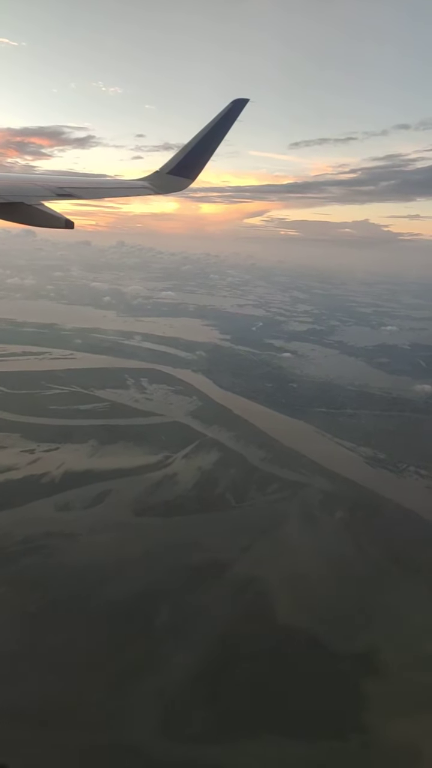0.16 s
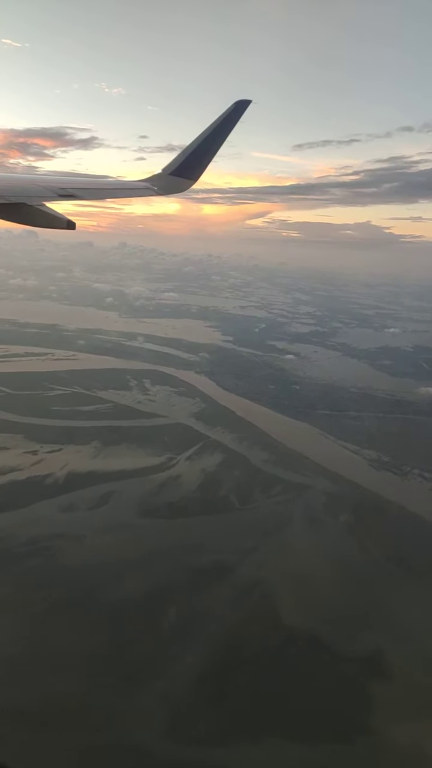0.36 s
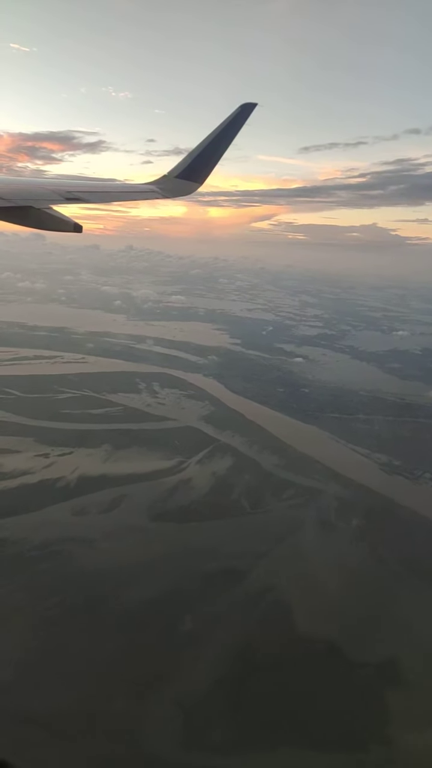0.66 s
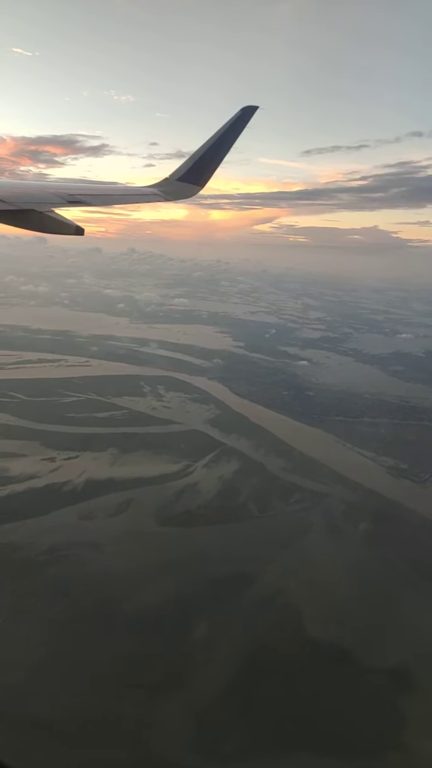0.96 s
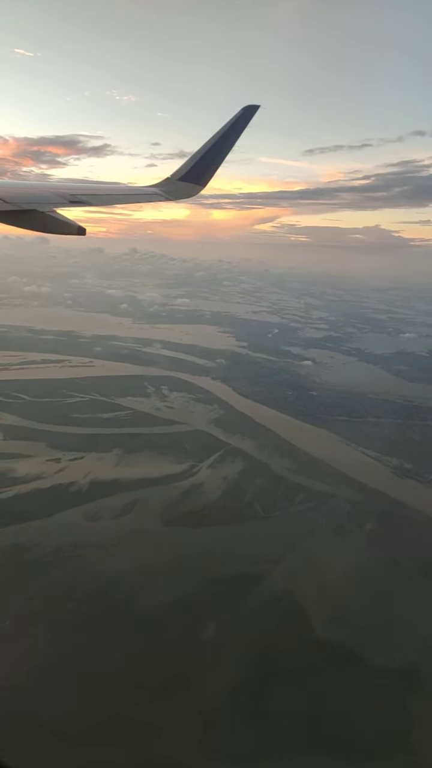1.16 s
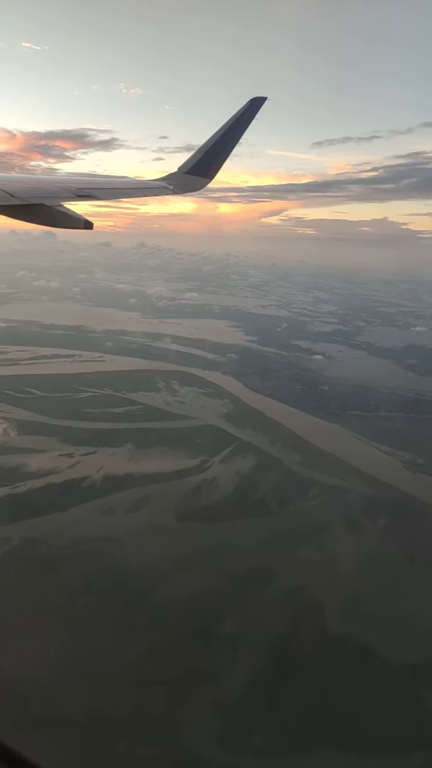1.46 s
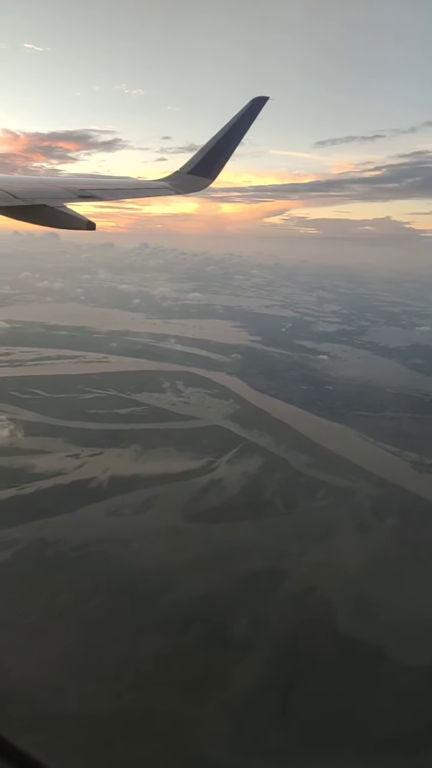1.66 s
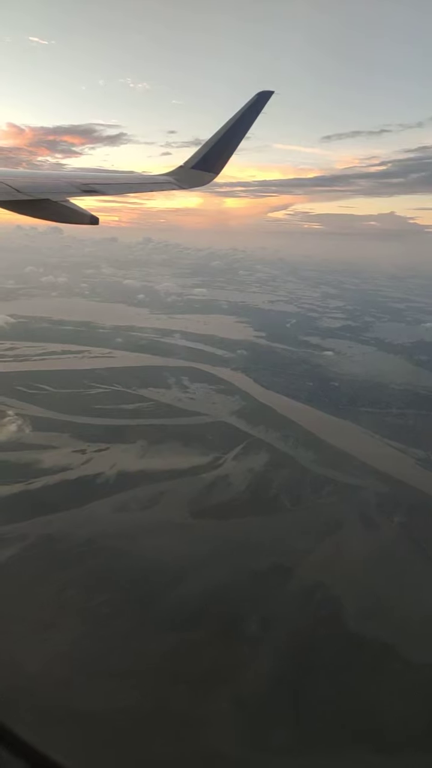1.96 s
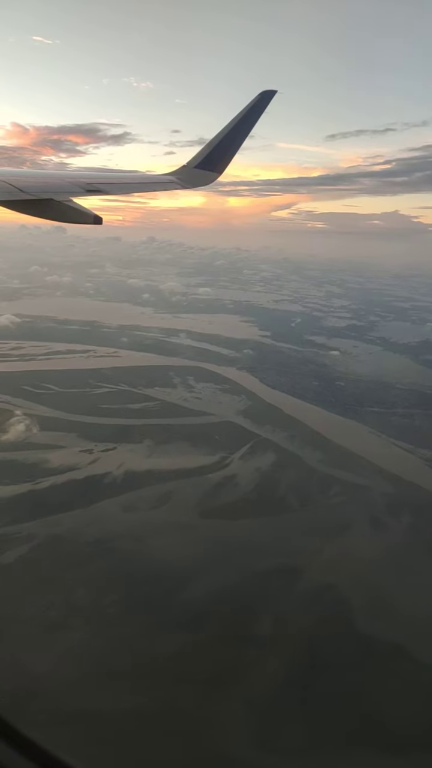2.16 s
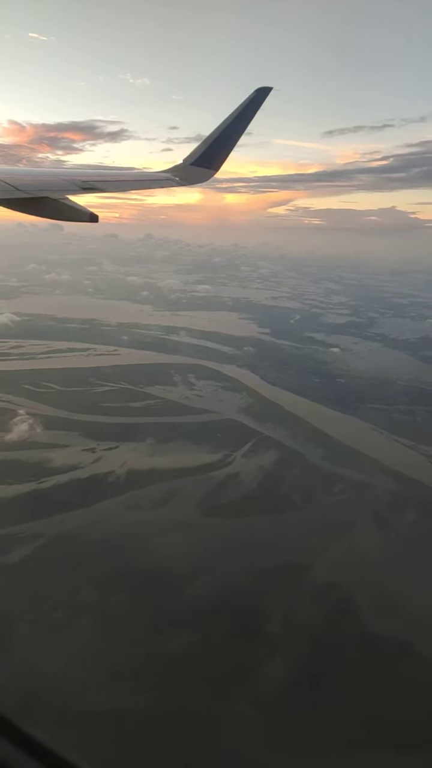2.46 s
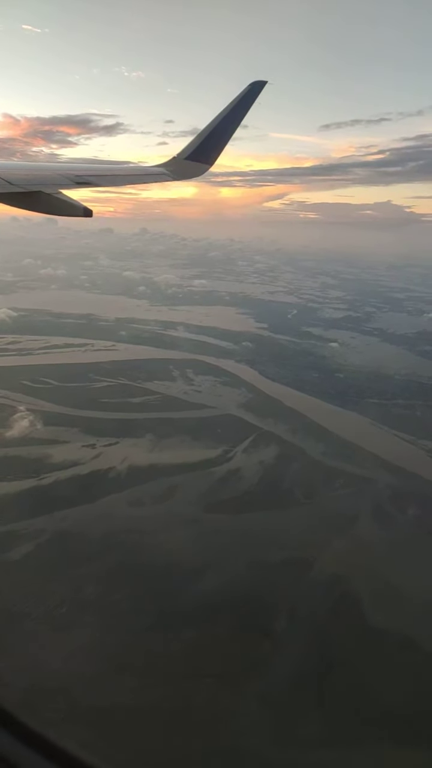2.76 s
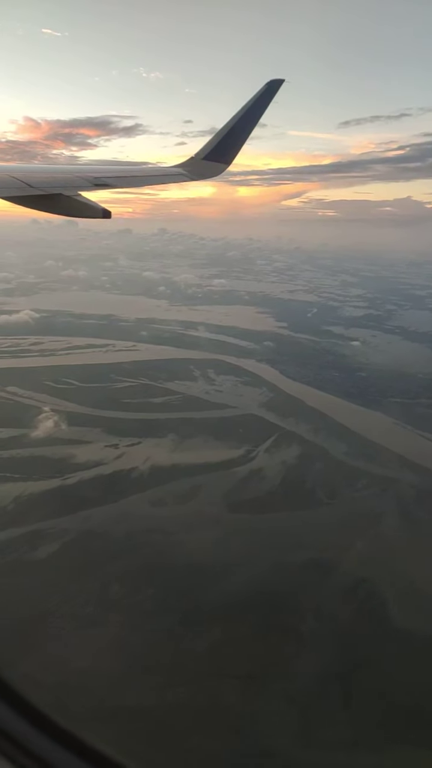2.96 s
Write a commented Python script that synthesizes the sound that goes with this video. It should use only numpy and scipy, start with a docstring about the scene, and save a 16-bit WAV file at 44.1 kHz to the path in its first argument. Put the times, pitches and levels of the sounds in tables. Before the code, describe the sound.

A deep jet engine drone fills an airliner cabin in flight. It heaves slightly with a few soft low bumps, while air rushes and hisses faintly along the wall, heard from a window seat.

```python
"""Airliner window seat in flight

Engine exhaust and turbulent air shake the fuselage: a deep drone that booms in the cabin's resonances.
Air rushing along the skin swells and eases, and rings the wall and window panels in narrow bands,
over an even ventilation hiss. The bass sits in the centre, the treble spreads wide."""
import sys
import numpy as np
from scipy import signal
from scipy.fft import rfft, irfft
from scipy.io import wavfile

SR = 44100
rng = np.random.default_rng(int(sys.argv[2]) if len(sys.argv) > 2 else 0)


def int16_out(signal):
    """Quantize to a 16-bit WAV file."""
    q = np.round(np.clip(np.atleast_2d(signal).T, -1, 1) * 32767)
    wavfile.write(sys.argv[1], SR, q.astype(np.int16))


N = 136710
HZ = np.maximum(np.arange(N // 2 + 1) * SR / N, 1)  # frequency of each FFT bin

# swell contour of the skin hiss and the treble panels: t/s, level/dB
TREBLE_CONTOUR = [(0.0, -58.5), (0.26, -63), (0.53, -66), (0.71, -60.5), (1.06, -61), (1.34, -59),
                  (1.42, -66), (1.57, -59), (1.7, -61), (1.82, -60), (2.0, -63), (2.16, -64), (2.34, -59.5),
                  (2.53, -61), (2.64, -63), (2.8, -58), (2.96, -64), (3.05, -59)]


def drone(low_cut_hz=36, high_cut_hz=700, sub_top_hz=89, bass_top_hz=194):
    """Exhaust and turbulence shake the fuselage and cabin: steady sub, heaving bass, flickering body."""
    # fuselage rumble: f/Hz, relative level/dB
    spectrum = [(22, -28), (59, -25.5), (86, -13), (147, -4.5), (297, -1.5), (454, -10.5), (493, -14),
                (631, -24.5), (755, -29), (1100, -30), (1430, -33), (2420, -120)]
    # cabin resonances: f/Hz, width/Hz, level/dB
    cabin_modes = [(101.3, 13, -50), (144.9, 15.2, -40), (287, 24.3, -45), (497.5, 6.8, -54.5),
                   (535.7, 9.3, -57.5), (567, 33, -61.5)]
    # swell contour of the bass: t/s, level/dB
    bass_contour = [(0.0, -41), (0.21, -34.5), (0.26, -45), (0.34, -33.5), (0.47, -32), (0.61, -45.5),
                    (0.71, -27.5), (0.97, -48), (1.02, -32.5), (1.23, -41.5), (1.41, -34), (1.49, -42),
                    (1.62, -28), (1.69, -38.5), (1.76, -35.5), (2.02, -32.5), (2.08, -43), (2.17, -36.5),
                    (2.64, -37.5), (2.78, -42), (3.05, -39)]
    # swell contour of the low mids: t/s, level/dB
    body_contour = [(0.0, -33), (0.59, -33), (0.63, -36.5), (1.51, -32), (1.56, -38), (1.69, -43.5),
                    (1.75, -26.5), (1.9, -42), (2.0, -37), (2.17, -34.5), (2.25, -28.5), (3.05, -34.5)]
    band = 1 / np.sqrt(1 + (HZ / high_cut_hz) ** 10 + (low_cut_hz / HZ) ** 10)
    rumble = undb(-33.5) * noise(undb(over_hz(spectrum)) * band)
    rumble += sum(undb(db) * noise(resonance(hz, width)) for hz, width, db in cabin_modes)
    lows = irfft(rfft(rumble) / (1 + (HZ / bass_top_hz) ** 10), N)
    sub = irfft(rfft(lows) / (1 + (HZ / sub_top_hz) ** 10), N)
    bass = (lows - sub) * swell(bass_contour, depth=0.88)
    body = eddies(rumble - lows, depth_db=2.5, rate_hz=26, low_hz=217.6, bands=16)
    return at_microphones(sub + bass + body * swell(body_contour, depth=0.41))


def bumps(waver=0.0386, waver_hz=30):
    """Each bump of turbulence rings the cabin at a low, unsteady pitch that builds and dies away."""
    # cabin booms: t/s, f/Hz, rise/s, decay/s, level/dB
    booms = [(0.335, 148, 0.0089, 0.076, -28), (0.508, 128, 0.012, 0.01, -29),
             (0.684, 151.2, 0.014, 0.027, -32), (2.614, 194, 0.002, 0.019, -27.5),
             (2.618, 104, 0.024, 0.032, -35)]
    t, out = np.arange(N) / SR, 0
    for start, hz, rise, decay, db in booms:
        age = np.maximum(t - start, 0)
        envelope = (1 - np.exp(-(age / rise) ** 2)) * np.exp(-age / decay)
        pitch = hz * (1 + waver * walk(waver_hz))
        cycles = np.cumsum(pitch) / SR + rng.random()
        out += undb(db) * envelope / envelope.max() * unit(np.sin(2 * np.pi * cycles))
    return out


def airflow():
    """Turbulent air outside the wall: a dull rush and a brighter hiss, both swelling and easing."""
    # dull rush: f/Hz, relative left level/dB, relative right level/dB
    rush_spectrum = [(415, -38, -18), (634, -7, 8), (814, -1, 2.5), (1068, -6.5, -4.5), (1380, -5.5, -6),
                     (1950, -11.5, -3.5), (2170, -10, -21), (3500, -56, -49)]
    # hiss along the skin: f/Hz, relative left level/dB, relative right level/dB
    hiss_spectrum = [(1510, -20.5, -7.5), (2400, -5, -6), (2620, -5.5, 3.5), (2970, -7, -5),
                     (3320, -5, -0.5), (3950, -14, -9.5), (4300, -18.5, -6), (4840, -16, -9),
                     (5100, -28, -16), (6470, -25, -7.5), (7540, -15, -28.5), (8200, -22.5, -30),
                     (12000, -61, -57)]
    # swell contour of the rush: t/s, level/dB
    rush_contour = [(0.0, -53), (0.2, -55), (0.26, -60.5), (0.44, -49), (0.5, -60.5), (0.66, -55),
                    (0.71, -61), (0.77, -55), (1.19, -59.5), (1.33, -59), (1.39, -59.5), (1.56, -54.5),
                    (2.14, -57.5), (2.21, -55), (2.42, -61.5), (3.05, -57.5)]
    rush = noise(undb([over_hz(rush_spectrum, column) for column in (1, 2)]))
    hiss = noise(undb([over_hz(hiss_spectrum, column) for column in (1, 2)]))
    rush = undb(-51) * eddies(rush, depth_db=5, rate_hz=12.5, low_hz=552, bands=16)
    hiss = undb(-59) * eddies(hiss, depth_db=3.5, rate_hz=14, low_hz=1916, bands=17)
    return rush * swell(rush_contour, depth=0.73) + hiss * swell(TREBLE_CONTOUR, depth=0.89)


def surges():
    """Brief surges in the airflow: bands of noise that swish in and out on a bell curve."""
    # swishes: centre t/s, length/s, f/Hz, width/Hz, level/dB
    swishes = [(0.79, 0.085, 593, 119, -43.5), (1.108, 0.14, 2840, 110, -62.5),
               (1.242, 0.057, 460, 150, -38), (1.327, 0.033, 1653, 220, -47.5),
               (1.334, 0.032, 3360, 450, -51.5), (1.361, 0.054, 239, 49, -36),
               (1.903, 0.058, 2700, 595, -54.5), (2.01, 0.05, 328, 68.6, -28),
               (2.374, 0.069, 697, 220, -46), (0.355, 0.043, 785, 130, -47.5),
               (2.785, 0.035, 2950, 1000, -51.5)]
    t, out = np.arange(N) / SR, 0
    for centre, length, hz, width, db in swishes:
        bell = np.exp(-2 * ((t - centre) / length) ** 2)
        burst = noise(resonance(hz, width)) * bell
        out += undb(db) * burst * np.linalg.norm(bell) / np.linalg.norm(burst, axis=1, keepdims=True)
    return at_microphones(out)


def wall():
    """Wall and window panels sound a hollow midrange ring, a treble ring and a thin sizzle."""
    # midrange panel modes: f/Hz, width/Hz, left level/dB, right level/dB
    ring_modes = [(1515, 120, -55, -62), (1631, 65, -52, -68.5), (1708, 96, -59, -80.5)]
    # treble panel modes: f/Hz, width/Hz, left level/dB, right level/dB
    treble_modes = [(2472, 52, -68.5, -77), (2812, 90, -66.5, -74.5), (2992, 60, -65, -72)]
    # highest panel modes: f/Hz, width/Hz, left level/dB, right level/dB
    sizzle_modes = [(6720, 520, -90, -70), (6760, 55, -74, -73.5), (7280, 350, -78, -75.5)]
    # swell contour of the midrange ring: t/s, level/dB
    ring_contour = [(0.0, -49.5), (0.14, -50), (0.56, -61), (0.63, -54.5), (0.81, -49.5), (1.04, -56),
                    (1.32, -53), (1.4, -61.5), (1.54, -54.5), (1.92, -51.5), (1.99, -60), (2.08, -50),
                    (2.28, -55.5), (2.35, -50), (2.46, -50.5), (2.64, -58), (2.7, -54.5), (2.9, -57),
                    (3.05, -50.5)]
    # swell contour of the sizzle: t/s, level/dB
    sizzle_contour = [(0.0, -67), (0.37, -70), (0.78, -67), (1.37, -73), (1.84, -65.5), (1.99, -74),
                      (2.04, -66.5), (2.27, -70), (3.05, -68.5)]
    ring = panels(ring_modes, flutter_db=2.25, flutter_hz=12) * swell(ring_contour, depth=0.99)
    treble = panels(treble_modes, flutter_db=2.5, flutter_hz=54) * swell(TREBLE_CONTOUR, depth=1)
    sizzle = panels(sizzle_modes, flutter_db=2, flutter_hz=11) * swell(sizzle_contour, depth=1.4)
    return ring + treble + sizzle


def panels(modes, flutter_db, flutter_hz):
    """Panel resonances shaken by turbulence, each fluttering on its own."""
    return sum(noise(resonance(hz, width)) * undb([[left], [right]]) * flutter(flutter_db, flutter_hz)
               for hz, width, left, right in modes)


def ventilation():
    """An even, distant bed of hiss from the cabin air."""
    # vent hiss: f/Hz, relative level/dB
    spectrum = [(1000, -20.5), (4300, 2), (7400, -5.5), (10000, -6), (12500, -12.5), (15500, -11)]
    return undb(-71) * noise(undb(over_hz(spectrum)))


def eddies(x, depth_db, rate_hz, low_hz, bands):
    """Passing eddies make narrow bands flicker, eight bands to the octave."""
    position = np.clip(8 * np.log2(HZ / low_hz), 0, bands - 1)
    spectrum, out = rfft(x), 0
    for k in range(bands):
        triangle = np.maximum(1 - abs(position - k), 0)
        out += irfft(spectrum * triangle, N) * flutter(depth_db, rate_hz)
    return out


def reflections(x, echo_db, decay_s):
    """Wall, window and seats return the hiss within milliseconds and ripple its spectrum."""
    tail = rng.standard_normal((2, N)) * np.exp(-np.arange(N) / SR / decay_s)
    response = rfft(tail) / np.linalg.norm(tail, axis=1, keepdims=True)
    return irfft(rfft(x) * (1 + undb(echo_db) * response), N) / np.hypot(1, undb(echo_db))


def at_microphones(x, right_lead_s=0.000092):
    """Mix two unrelated noises as mid and side: nearly mono in the bass, wider above."""
    # likeness of left and right: f/Hz, correlation
    likeness = [(220, 0.96), (350, 0.92), (480, 0.69), (620, 0.8), (900, 0.6)]
    # stereo balance: f/Hz, left minus right level/dB
    balance = [(50, -2.5), (145, -0.1), (300, -0.5), (470, -0.5), (1000, -0.5)]
    mid, side = rfft(x)
    correlation, sign = over_hz(likeness), np.array([[1], [-1]])
    pair = mid * np.sqrt((1 + correlation) / 2) + sign * side * np.sqrt((1 - correlation) / 2)
    pan = undb(sign * over_hz(balance) / 2)
    delay = np.exp(-1j * np.pi * sign * HZ * right_lead_s)
    return irfft(pair * pan * delay, N)


def swell(contour, depth):
    """Gain of rms 1 that rides a contour, its dB swings multiplied by depth."""
    times, levels = np.array(contour, float).T
    db = np.interp(np.arange(N) / SR, times, levels)
    return unit(undb(depth * (db - db.mean())))


def flutter(depth_db, rate_hz):
    """Randomly wavering gain of rms 1."""
    return unit(undb(depth_db * walk(rate_hz)))


def walk(rate_hz):
    """Smooth random motion of rms 1."""
    period = max(int(SR / rate_hz), 1)
    return unit(irfft(rfft(rng.standard_normal(N)) / (1 + (HZ * period / SR) ** 4), N))


def noise(response):
    """Two unrelated noises with the given frequency response, rms 1."""
    return unit(irfft(rfft(rng.standard_normal((2, N))) * response, N))


def resonance(hz, width):
    """Response of a resonance with steep skirts."""
    return 1 / (1 + ((HZ / hz - hz / HZ) * hz / width / 2) ** 2) ** 2


def over_hz(table, column=1):
    """One column of a frequency table, joined on a log axis."""
    rows = np.array(table, float)
    return np.interp(np.log(HZ), np.log(rows[:, 0]), rows[:, column])


def undb(db):
    """Decibels to gain."""
    return 10 ** (np.asarray(db) / 20)


def unit(x):
    """Scale to rms 1."""
    return x / np.sqrt(np.mean(x ** 2))


def scene(buffet_db=1.0, buffet_hz=55):
    """Drone, bumps and surges, with one quick buffeting shared by the air and the panels."""
    air = reflections(airflow() + ventilation(), echo_db=-9, decay_s=0.015)
    return drone() + bumps() + surges() + (air + wall()) * undb(buffet_db * walk(buffet_hz))


def record(dry):
    """A steep low-pass trims the top at 15.5 kHz."""
    return signal.sosfilt(signal.ellip(10, 0.1, 80, 15500, fs=SR, output="sos"), dry)


dry = scene()
out = record(dry)
int16_out(out)
```